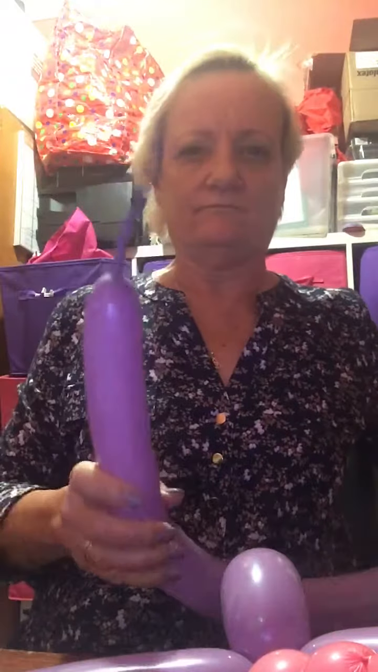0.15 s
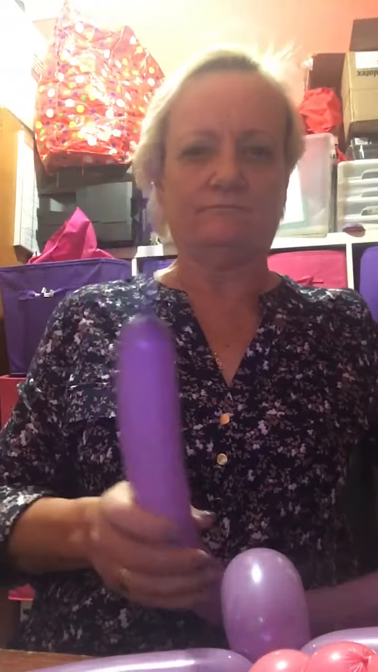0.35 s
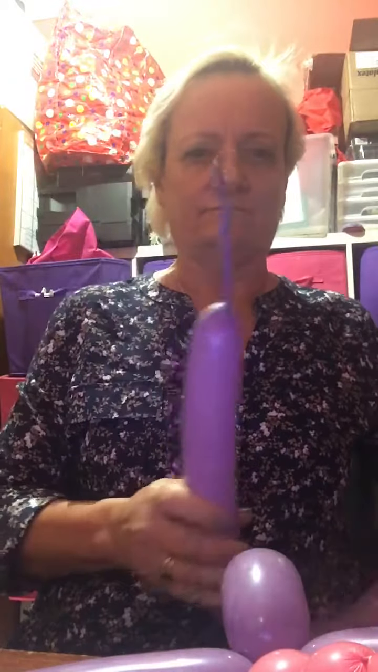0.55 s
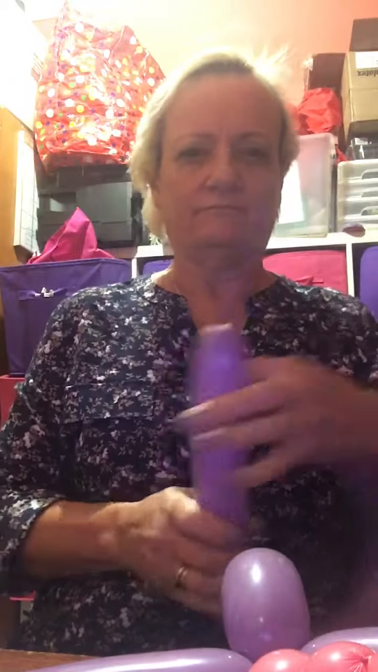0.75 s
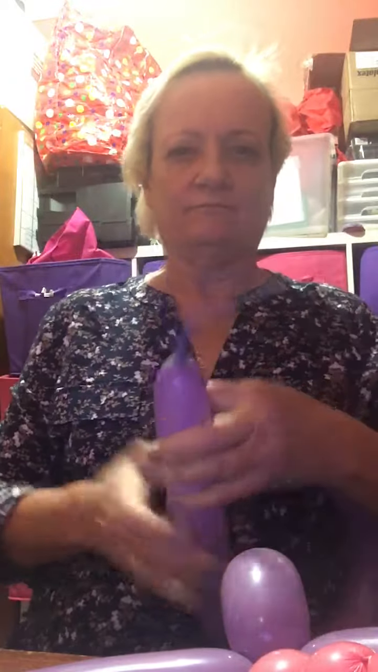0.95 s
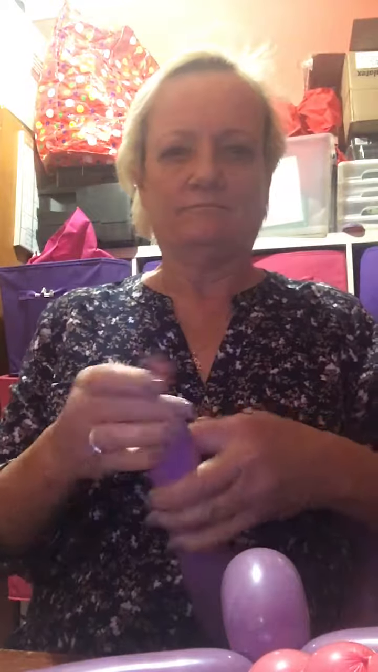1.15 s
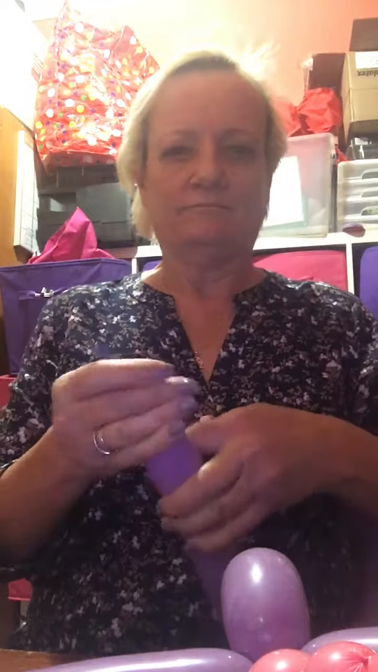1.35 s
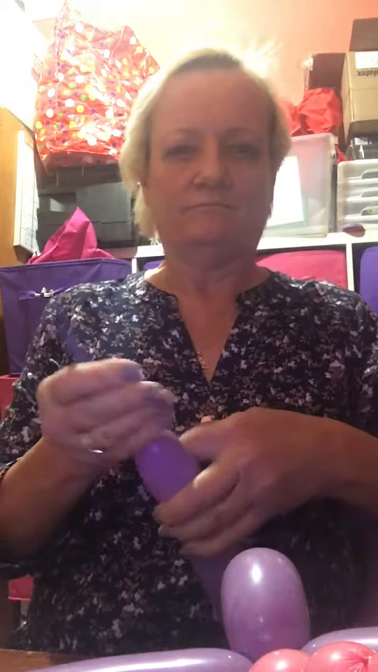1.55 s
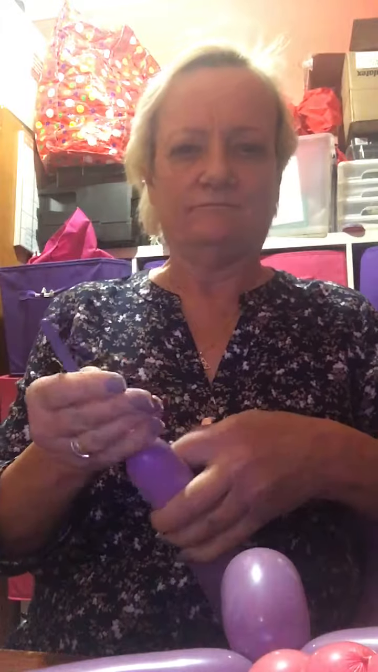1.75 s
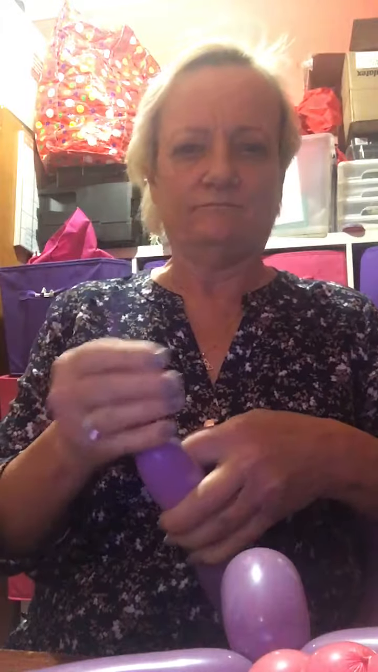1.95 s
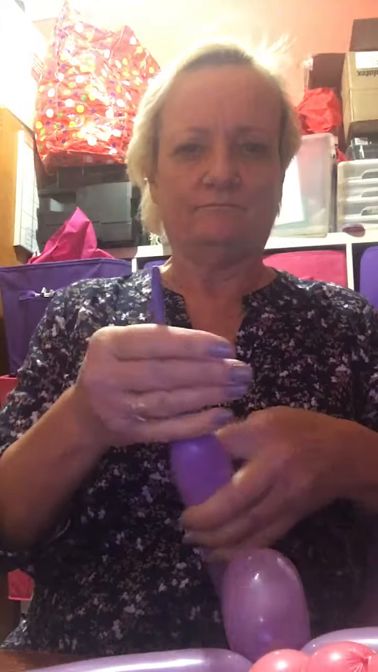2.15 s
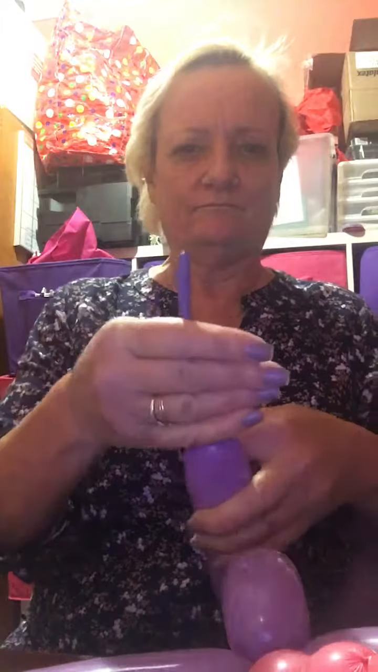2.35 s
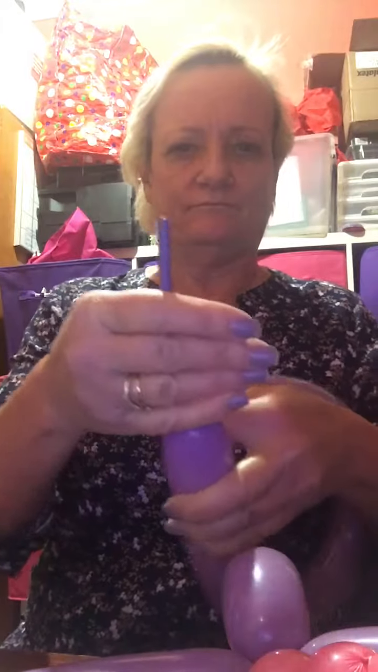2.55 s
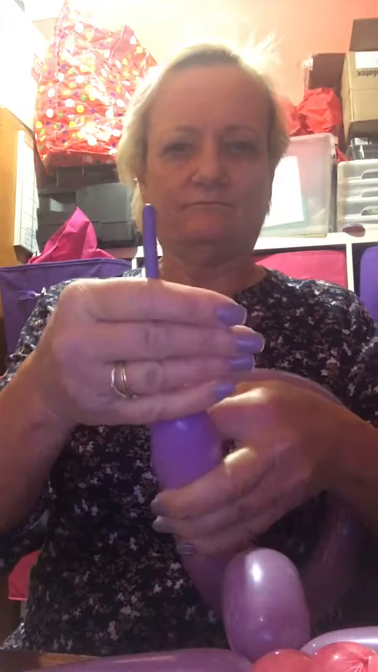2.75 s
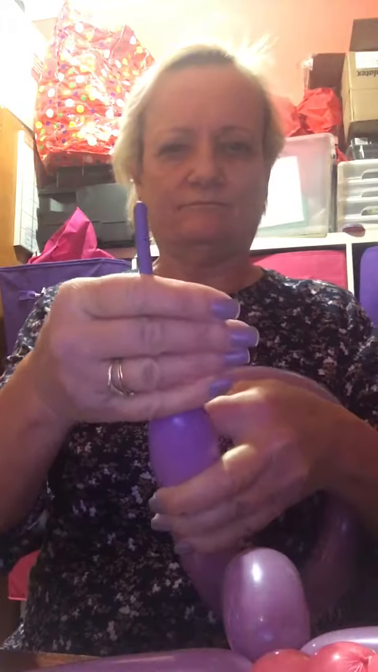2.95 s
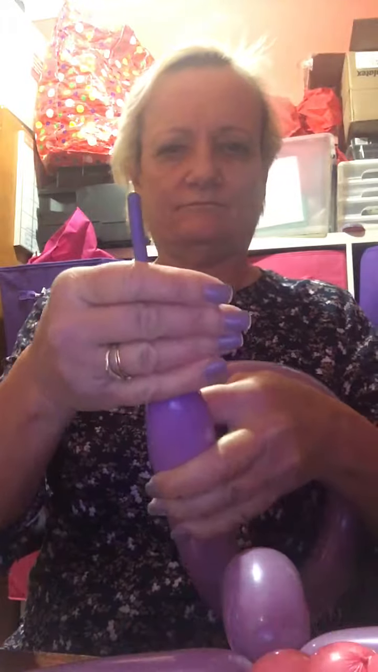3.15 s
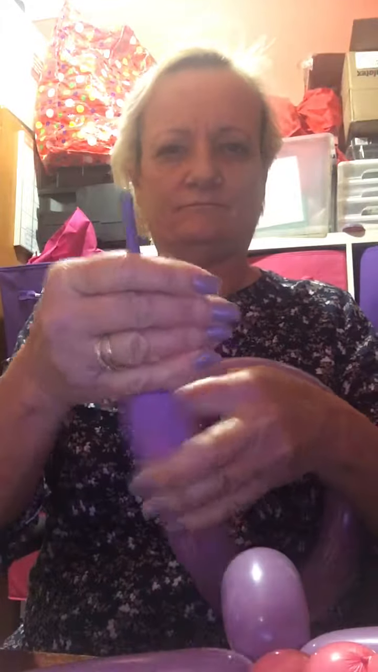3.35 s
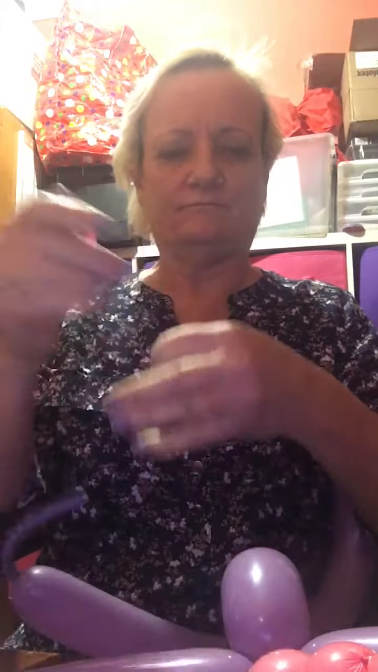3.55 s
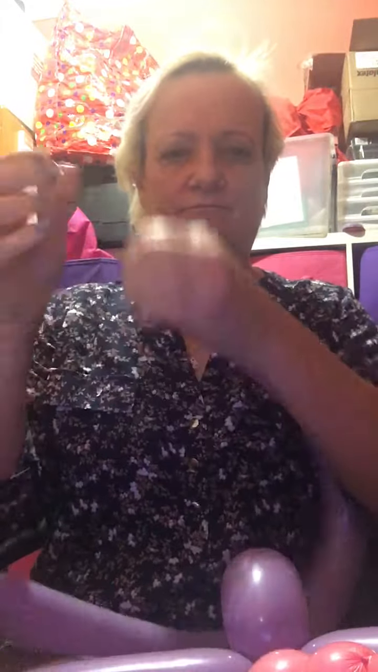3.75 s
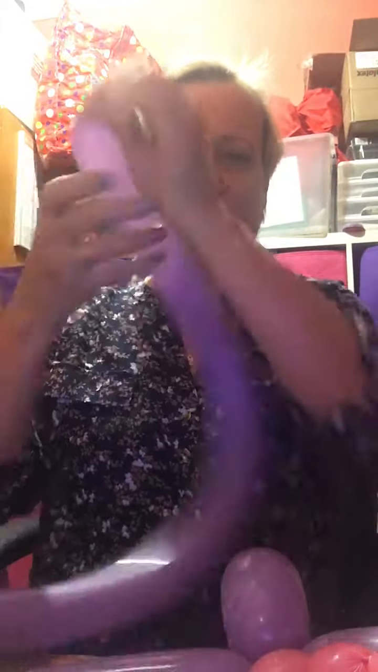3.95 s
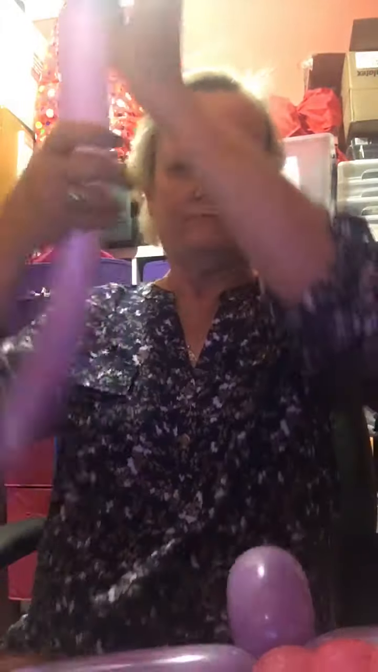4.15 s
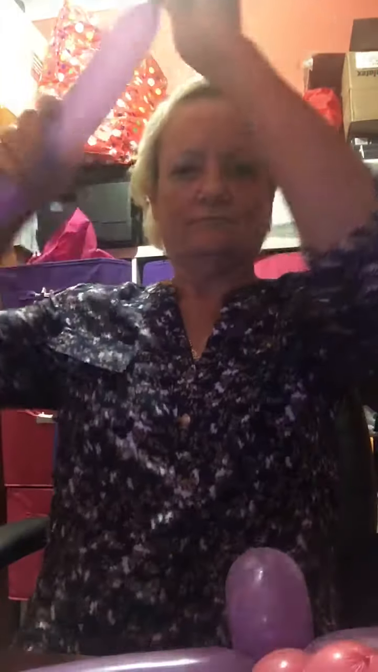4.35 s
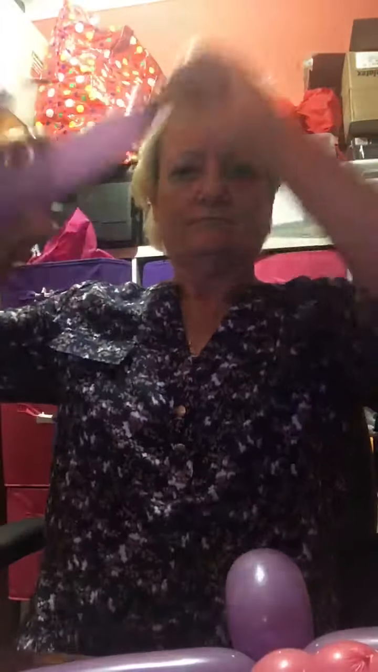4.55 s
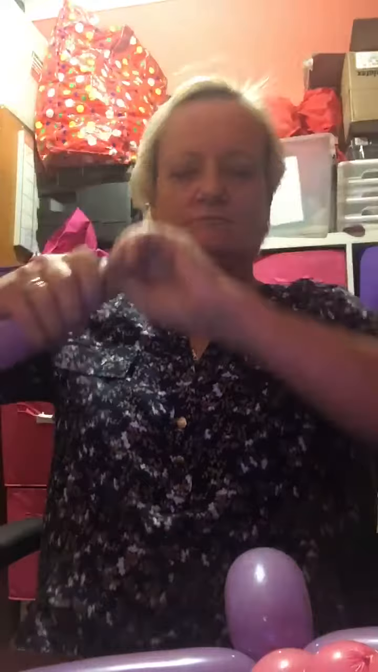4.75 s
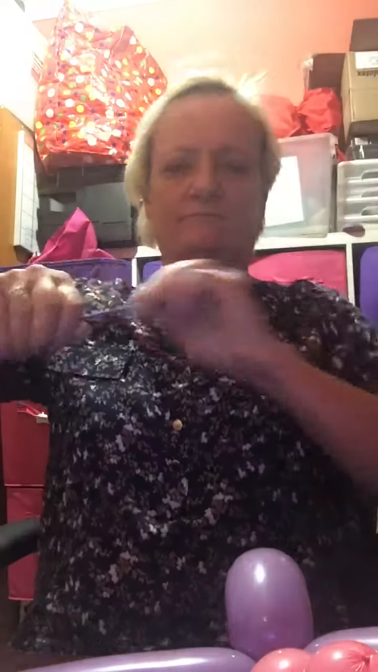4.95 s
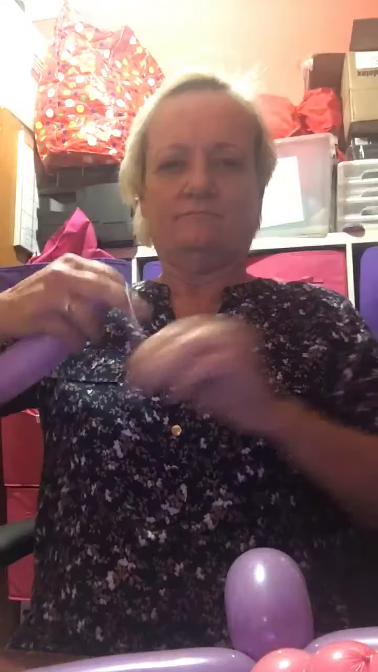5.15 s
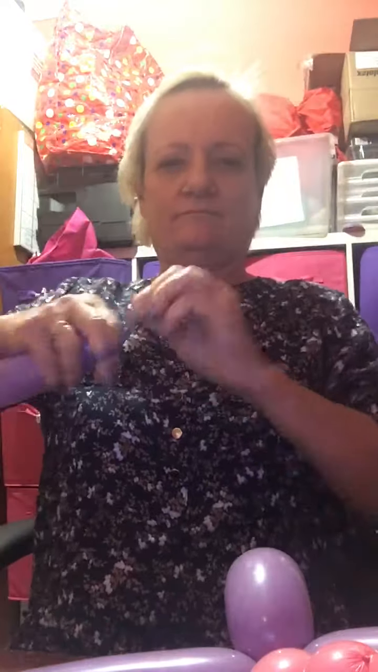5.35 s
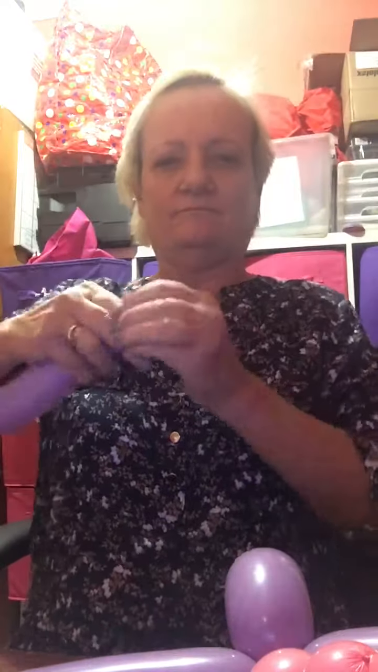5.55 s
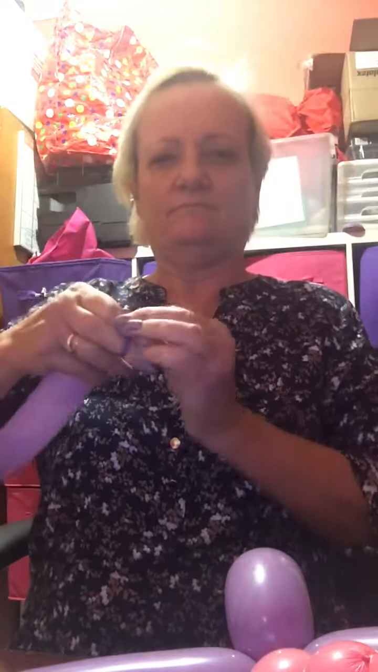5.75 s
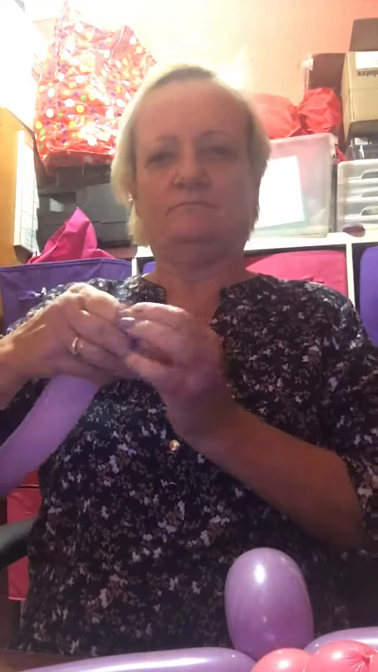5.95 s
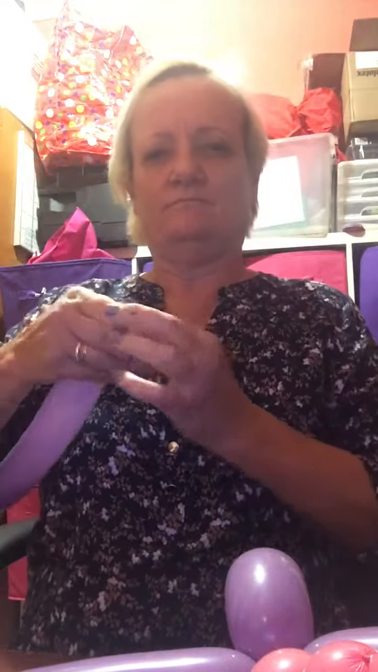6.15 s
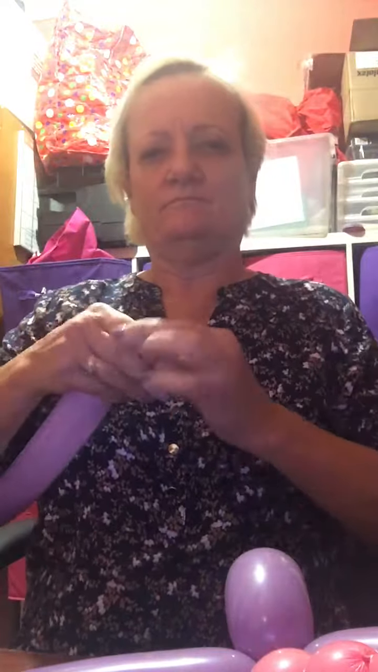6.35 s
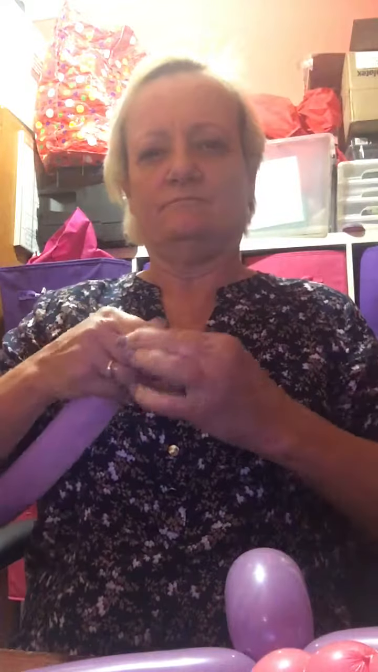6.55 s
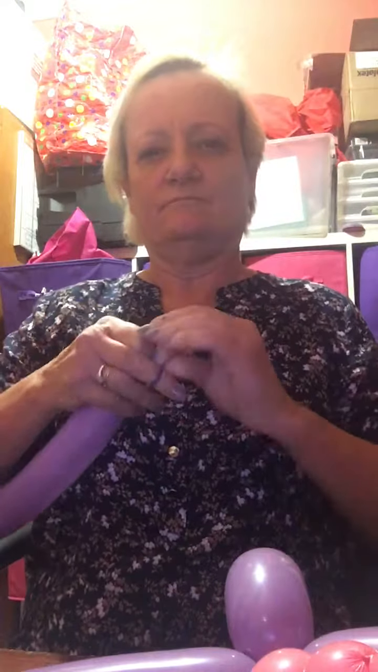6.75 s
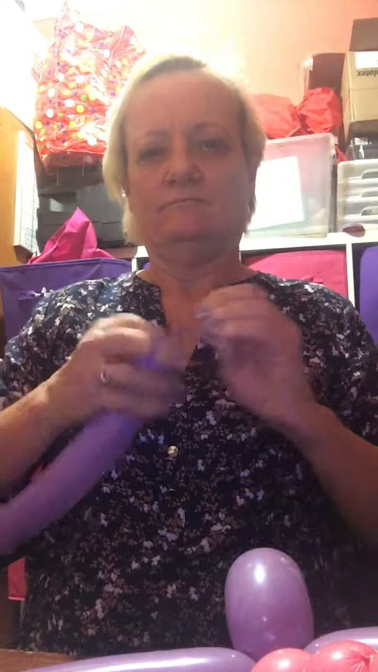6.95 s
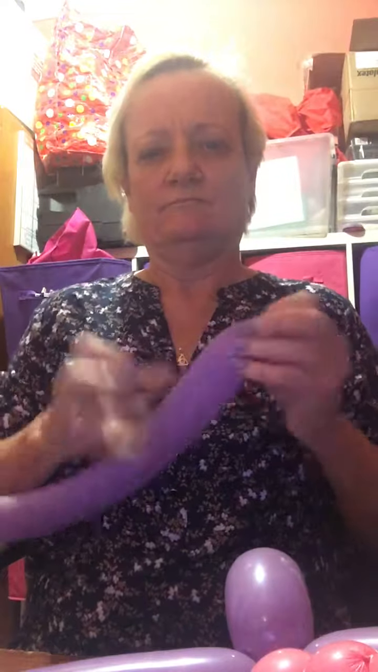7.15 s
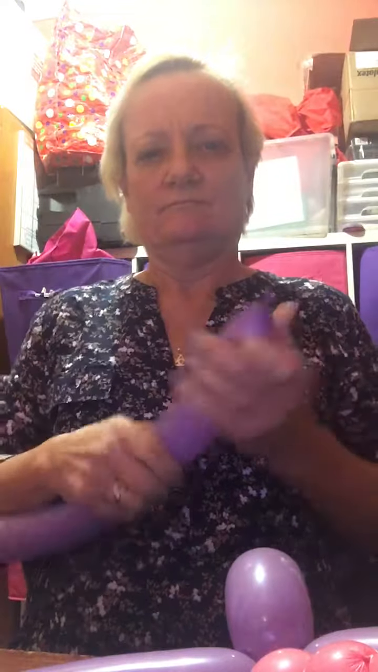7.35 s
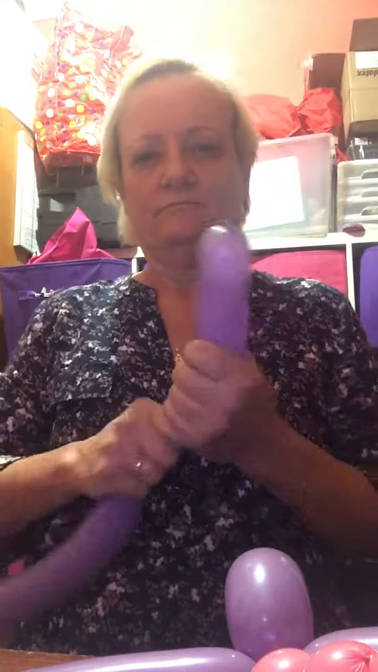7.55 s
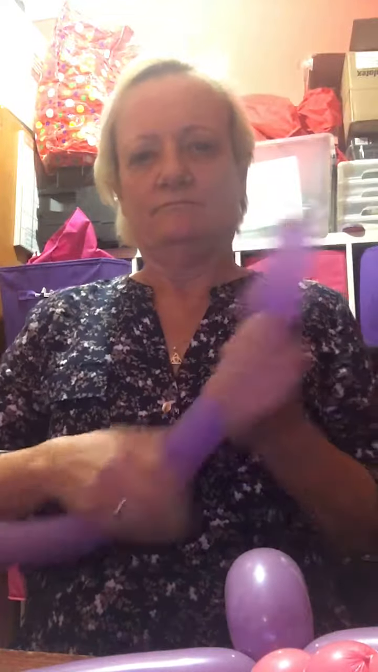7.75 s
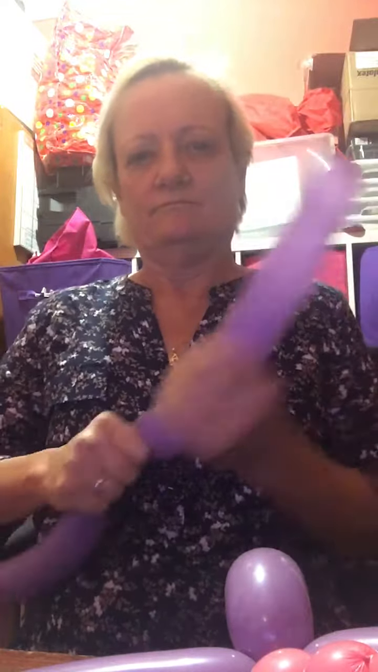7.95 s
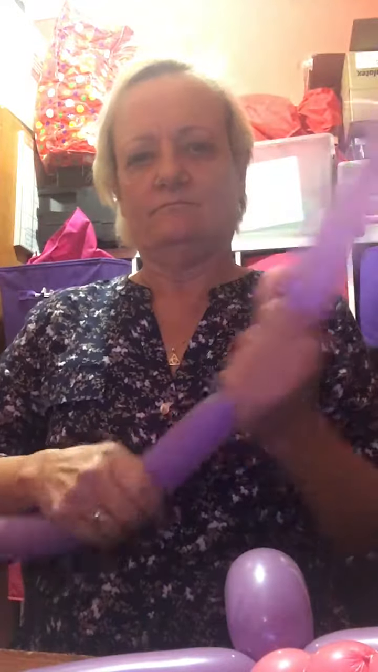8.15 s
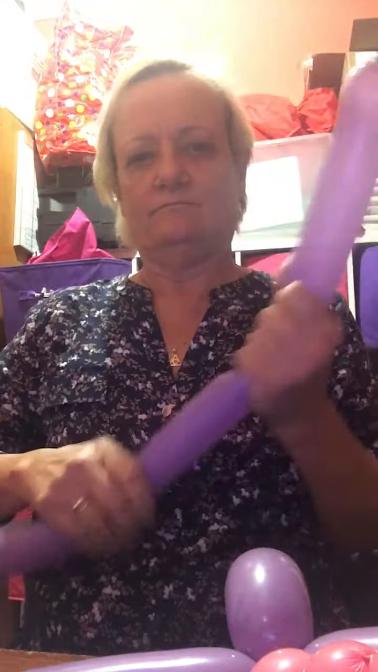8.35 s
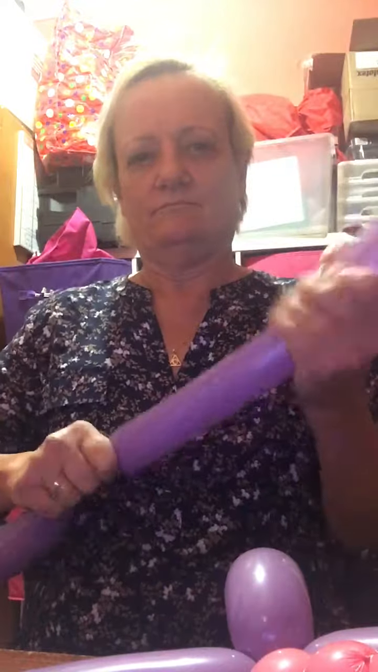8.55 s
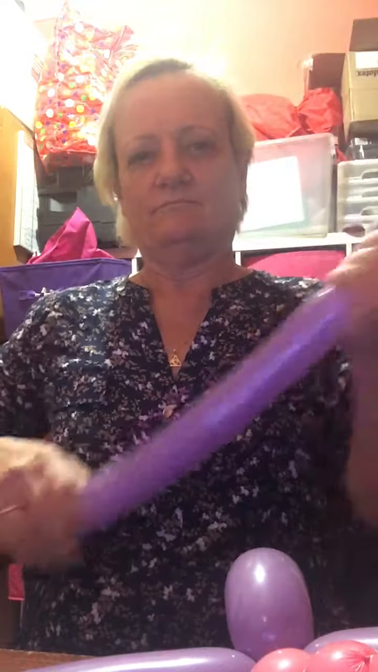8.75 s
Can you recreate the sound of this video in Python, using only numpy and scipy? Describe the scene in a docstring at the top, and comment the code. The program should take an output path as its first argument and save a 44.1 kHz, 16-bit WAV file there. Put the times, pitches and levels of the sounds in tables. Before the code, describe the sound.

A long latex balloon is handled close to the microphone in a small room with a short echo, low ventilation noise and a faint hum. For the first two seconds, fingers rub the rubber in short creaks and squeaks, with a sharp snap at about 0.6 seconds. Faint creaking fades to a lull, broken at 3.5 seconds by a loud snap and hollow thump. Smaller clicks, knocks and skin rustle follow from 4 to 4.7 seconds. Near 4.9 seconds comes one brief, loud, high squeal with a hissing flick of the tail, then another flick at 5.4 seconds. Quiet picking at the knot and soft creaks last until about 7 seconds. The loudest snap lands with a thump at 7.2 seconds. From there to nearly 9 seconds, hands slide along the balloon with steadier rubbing, short squeaks, sharp clicks and hollow knocks.

```python
"""A long latex balloon, squeezed, stretched, knotted and twisted by hand close to a phone microphone.
Skin on rubber rustles, creaks in runs of stick and slip and snaps as it lets go, ringing the inflated
wall. The fastest slips fuse into one loud squeal and a few faint ones. The thin tail whips through the
fingers, and the long tube of air thumps when knocked. The place is a small quiet room with a short
echo, low ventilation noise and a faint hum."""
import sys
import numpy as np
from scipy import signal
from scipy.fft import rfft, irfft
from scipy.io import wavfile
from scipy.ndimage import uniform_filter1d

SR = 44100
rng = np.random.default_rng(int(sys.argv[2]) if len(sys.argv) > 2 else 0)


def dump(signal):
    """Clip the signal to [-1, 1] and save it as 16-bit WAV at the path in sys.argv[1]."""
    limited = np.clip(np.atleast_2d(signal).T, -1, 1)
    pcm = np.round(limited * 32767).astype(np.int16)
    wavfile.write(sys.argv[1], SR, pcm)


N = 388080

# The inflated wall. Each row: mode frequency in Hz, width in Hz, level in dB.
WALL_MODES = [(195.6, 138, 10), (317, 150, -0.5), (441, 85, 0.5), (637, 170, 2.5), (964, 220, 2.5),
              (1189, 116, 0), (1670, 580, 0.5), (2023, 230, -1.5), (2417, 390, -3), (3336, 370, -6),
              (4020, 850, -10.5), (6000, 2730, -4.5), (9120, 950, -26.5), (12740, 2570, -20)]
# Runs of slips. Each row: start in seconds, length in seconds, level in dB, slips per second at start
# and end, pitch of the pinched patch in Hz at start and end, gain of the whole wall in dB.
CREAK_RUNS = [(0.045, 0.032, -46, 100, 125, 1400, 1400, 0.5), (0.114, 0.042, -49, 150, 110, 1400, 1400, 4),
              (0.236, .068, -44, 110, 100, 1190, 1090, 0), (0.33, .05, -45.5, 143, 145, 990, 990, 0),
              (0.395, .035, -48.5, 110, 110, 1300, 1300, -1), (0.471, .1, -32, 400, 400, 970, 970, -4),
              (0.595, 0.099, -36, 326, 400, 1030, 1240, -0.5),
              (0.841, 0.13, -40.5, 81, 83, 1430, 867, -3.5), (1.488, 0.074, -46.5, 70, 107, 1920, 1230, 2),
              (1.565, 0.1, -48.5, 50, 72, 980, 740, 2.5), (1.665, 0.13, -42.5, 97, 59.5, 750, 750, 3.5),
              (1.85, 0.098, -53.5, 133, 135, 1500, 1170, 1),
              (1.962, 0.068, -34.5, 380, 442, 1190, 1130, -2), (2.5, .31, -50, 54, 60, 1260, 1190, -6),
              (2.88, 0.13, -55, 58, 54, 1230, 1200, -4.5), (5.715, 0.047, -47.5, 120, 170, 1000, 950, -6),
              (6.545, .095, -42, 122, 77, 790, 840, -28), (6.645, .14, -41, 130, 196, 776, 1100, -6.5),
              (7.02, .11, -50, 400, 450, 1900, 1300, -7), (7.132, 0.029, -30, 390, 380, 1150, 1080, 0.5),
              (7.357, .06, -39, 400, 400, 1212, 1000, -6), (7.529, .045, -28.5, 407, 405, 1030, 970, -2.5),
              (7.857, .04, -36, 400, 460, 1230, 1190, -5.5), (8.215, 0.033, -39, 390, 500, 1350, 1380, -6)]
# The rubber lets go. Each row: start in seconds, level in dB, pitch in Hz, crispness in dB.
RUBBER_SNAPS = [(0.214, -34.5, 1210, -22), (0.442, -34.5, 650, -23), (0.579, -10, 1970, -7),
                (0.782, -29, 1190, -15), (0.829, -24, 1260, -26), (1.374, -29.5, 1590, -14),
                (2.025, -27.5, 1040, -7), (2.129, -27, 1160, -20), (3.499, -24, 460, -25),
                (3.508, -17.5, 1820, -49), (3.513, -8.5, 1080, -20), (3.595, -33.5, 1190, -29),
                (3.707, -29.5, 1410, -24), (4.059, -25.5, 1190, -26), (4.109, -21, 1170, -28),
                (4.13, -25, 527, -26), (4.177, -23.5, 2100, -27), (4.223, -24, 1270, -27),
                (4.438, -28, 1160, -30), (4.485, -29, 2040, -25), (4.497, -25.5, 1130, -32),
                (4.511, -27, 2040, -25), (4.735, -31, 1140, -11), (4.856, -19, 2020, -10),
                (5.363, -25, 1200, -5), (5.376, -23, 1050, -26), (5.811, -35, 2480, -24),
                (5.93, -34.5, 2330, -27), (6.098, -36, 970, -27), (6.123, -33, 1510, -28),
                (7.08, -29.5, 2450, -20), (7.137, -17.5, 1780, -10), (7.15, -17, 830, -19),
                (7.166, -5.5, 790, -16.5), (7.168, -3.5, 2150, -17), (7.361, -28.5, 1300, -29),
                (7.381, -24, 1130, -17), (7.496, -29, 861, -18), (7.527, -23, 970, -25),
                (7.55, -18, 2080, -27), (7.709, -22, 4130, -34), (7.816, -22, 3320, -2),
                (7.985, -28, 1120, -26), (8.002, -24.5, 1220, -28), (8.308, -23.5, 2720, -32),
                (8.321, -20, 1130, -18), (8.415, -21.5, 3800, -26), (8.502, -29.5, 1390, -8),
                (8.586, -17, 1350, -40), (8.673, -17, 3550, -48)]
# Knocks and kinks. Each row: start in seconds, level in dB, t60 in seconds, hollowness in dB.
TUBE_KNOCKS = [(0.827, -39, 0.066, 2), (3.508, -18, 0.072, 2), (3.524, -12, 0.048, 0),
               (4.06, -40, 0.16, 16), (4.109, -29.5, 0.23, 2), (4.178, -23, 0.065, -2.5),
               (4.201, -38, 0.061, 0), (4.695, -34, 0.13, -2), (4.913, -35, 0.05, 7),
               (5.375, -41.5, 0.24, 4), (7.168, -13, 0.069, -2.5), (7.376, -31.5, 0.15, 7),
               (7.542, -27, 0.093, 2), (7.604, -29.5, 0.13, -16), (7.673, -29.5, 0.081, -18),
               (7.882, -38, 0.088, 2), (7.985, -23, 0.078, -11), (8.321, -18.5, 0.11, -11),
               (8.373, -25, 0.05, -19), (8.416, -25, 0.081, -14), (8.586, -19.5, 0.15, -16.5)]
# The tube's air column and bending. Each row: mode frequency in Hz, level in dB.
TUBE_MODES = [(72, -14.5), (97, 0.5), (125, -2), (155, -4), (190, -2), (245, -8.5), (315, -7)]
# Modes across the tube. Each row: frequency in Hz, level in dB, t60 in seconds.
HOLLOW_MODES = [(445, -3, 0.063), (600, 0.5, 0.04), (920, -16, 0.067), (1172, -3, 0.11)]
# Stretched rubber singing under a fingertip. Each row: start in seconds, length in seconds,
# level in dB, pitch in Hz at start, middle and end.
SQUEAL_BENDS = [(4.866, 0.0237, -12, 2330, 2100, 2620), (4.914, .0045, -4.5, 2390, 2320, 2400),
                (4.9186, 0.00397, -10, 2250, 2300, 2400), (4.062, 0.032, -35, 1170, 1170, 1170),
                (4.138, .03, -32, 620, 510, 470), (4.175, 0.026, -36.5, 455, 410, 330),
                (.925, 0.0274, -40, 520, 495, 420)]
# A squeal's harmonics, fundamental first. Each entry: level in dB.
HARMONICS_DB = [0, -28, -44, -36, -44, -36]
# The tail whips free. Each row: start in seconds, level in dB, t60 in seconds.
TAIL_WHIPS = [(4.916, -7, 0.15), (5.366, -13.5, 0.012), (5.697, -31, 0.022), (7.709, -25, 0.04),
              (7.816, -19.5, 0.032), (8.113, -23, 0.018), (8.28, -30, .015), (8.417, -16, 0.02),
              (8.674, -18, .015)]
# The tail's hiss. Each row: frequency in Hz, spectral level in dB.
WHIP_SPECTRUM = [(290, -53), (500, -16), (1920, -8.5), (2500, 1), (3300, -10), (10300, -9.5), (13600, -5.5),
                 (15800, -12), (16500, -39)]
# Sliding fingers. Each row: time in seconds, rubbing level in dB, skin hiss level in dB.
RUB_LEVELS = [(0.0, -50, -52), (0.1, -57, -72), (0.42, -53, -73), (0.48, -44.5, -55), (0.7, -43.5, -51),
              (0.95, -52.5, -52), (1.25, -52, -58), (1.62, -49, -60), (1.81, -53, -76), (2.0, -53, -75),
              (2.2, -56, -55.5), (2.5, -55.5, -57), (2.65, -49.5, -60), (2.84, -63, -80), (3.38, -63, -80),
              (3.42, -46.5, -51), (3.56, -55, -49), (3.64, -55.5, -62), (3.78, -51, -51.5),
              (4.16, -47.5, -48.5), (4.75, -58, -54), (4.88, -44.5, -42), (5.1, -54.5, -57),
              (5.45, -54, -52.5), (6.15, -55, -63), (6.5, -51.5, -53), (6.85, -59, -56),
              (7.0, -55.5, -50.5), (7.1, -43, -43.5), (7.28, -46, -57), (7.6, -45, -49.5),
              (8.8, -48.5, -48)]
# Dry skin on rubber. Each row: frequency in Hz, spectral level in dB.
SKIN_SPECTRUM = [(1470, -8), (2500, -3), (4080, -5), (4850, -10.5), (5460, -7), (7670, -13.5),
                 (15000, -14.5), (16100, -26), (16500, -48.5)]
# The small room's echo. Each row: frequency in Hz, t60 in seconds.
ROOM_T60 = [(150, 0.34), (600, 0.16), (2400, 0.27), (6000, 0.22), (14000, 0.076)]
# Ventilation in the background. Each row: frequency in Hz, spectral level in dB.
VENT_SPECTRUM = [(15, -47), (25, -2), (43, -3), (76, 4), (146, -14), (208, -10.5), (313, -22), (410, -15),
                 (746, -18.5), (1150, -17.5), (1360, -16.5), (4130, -39.5), (16500, -74)]

CREAK_RISE_S, CREAK_FALL_S, CREAK_EDGE_DB = .01, .014, -10.5  # a run swells from and dies to this edge
BALLOON_ROOM_DB, SQUEAL_ROOM_DB = -9.5, -16  # sent to the room; low, as the microphone is close


def wall(push):
    """Rings the modes of the inflated wall; low waves travel slowly on the rubber and swell late."""
    t = np.arange(3000) / SR
    ring = np.zeros(len(t))
    for k, (hz, width, db) in enumerate(WALL_MODES):
        envelope = (1 - np.exp(-.8 * hz * t)) ** 2 * np.exp(-np.pi * width * t)
        ring += (-1) ** k * amp(db) * width * envelope * np.sin(2 * np.pi * hz * t)
    return signal.oaconvolve(push, ring / np.linalg.norm(ring))[:len(push)]


def creak(length, level_db, from_per_s, to_per_s, from_hz, to_hz, wall_db):
    """Stick and slip: each slip clicks into the wall; fast runs are more uneven and dull."""
    t = np.arange(0, length + .03, 1 / SR)
    hz = np.interp(t, [0, length], [from_hz, to_hz])
    edges = np.maximum(1 - t / CREAK_RISE_S, 0) + np.maximum(1 - (length - t) / CREAK_FALL_S, 0)
    per_s = np.interp(t, [0, length], [from_per_s, to_per_s])
    uneven = np.clip(per_s / 420, 0, 1) ** 1.2
    wander = np.tanh(unit_rms(uniform_filter1d(rng.standard_normal(len(t)), 200)))
    per_s *= np.exp(.6 * uneven * wander)
    slips = np.diff(np.floor(np.cumsum(per_s) / SR), prepend=-1) * (t <= length)
    spread_db = (1.05 + 1.6 * uneven) * rng.standard_normal(len(t))  # slow slips are alike
    slips *= amp(level_db + CREAK_EDGE_DB * edges + spread_db)
    slips *= np.sqrt(SR / per_s)  # a long stick stores more
    scrape = signal.lfilter([.09], [1, -.97], slips) * rng.standard_normal(len(t))  # drags about 1 ms
    sharp = wall(slips + .5 * scrape)
    dull = butter(sharp, 2, 3500, "low")
    patch = resonate(resonate(slips, hz, 480), hz, 480)  # the rubber under the finger
    return amp(wall_db) * (uneven * dull + (1 - uneven) * sharp) + 4.6 * patch


def snap(level_db, hz, crisp_db, noise, t60=.018):
    """The rubber lets go at once: a burst rings the released patch and the wall, with a crisp top."""
    t = np.arange(len(noise)) / SR
    burst = noise * amp(-60 * t / t60) * np.minimum(t / .00065, 1)
    patch = resonate(resonate(burst, hz, .76 * hz), hz, .76 * hz)
    wall_ring = resonate(wall(burst), hz, 5.5 * hz)
    body = unit_rms(patch) + .54 * unit_rms(wall_ring)
    top = butter(burst, 3, 4500, "high")
    return amp(level_db) * (unit_peak(body) + amp(crisp_db + 2.5) * unit_peak(top))


def knot_picking(span_s=(5.68, 6.16), count=8, level_db=-40, low_hz=910, high_hz=2720, crisp_db=-25):
    """Fingers pick at the knot: rows of small snaps, loosely spaced and random in pitch."""
    when, size, pitch = rng.random((count, 3)).T
    starts = np.interp(np.arange(count) + when, [0, count], span_s)
    levels = level_db + 6 * (size - .5)
    pitches = low_hz * (high_hz / low_hz) ** pitch
    return [(start, db, hz, crisp_db) for start, db, hz in zip(starts, levels, pitches)]


def thump(level_db, t60, hollow_db, scatter):
    """A knock rings the tube's low and hollow modes, catching each differently every time."""
    t = np.arange(SR // 3) / SR
    low, hollow = np.zeros((2, len(t)))
    for (hz, db), (catch, detune) in zip(TUBE_MODES, scatter):
        low += amp(db + 2 * catch) * np.sin(2 * np.pi * hz * (1 + .05 * detune) * t + catch)
    low *= amp(-60 * t / t60) * np.minimum(t / .0033, 1)
    for (hz, db, mode_t60), (phase, catch) in zip(HOLLOW_MODES, scatter):
        hollow += amp(db + 2 * catch - 60 * t / mode_t60) * np.sin(2 * np.pi * hz * t + 3 * phase)
    hollow *= np.minimum(t / .00082, 1)
    return amp(level_db) * (unit_peak(low) + .54 * amp(hollow_db) * hollow)


def squeal(length, level_db, from_hz, mid_hz, to_hz, hiss, hiss_db=-19):
    """Slips so fast and even that they fuse into a near sine, with air and skin noise riding on it."""
    t = np.arange(0, length, 1 / SR)
    bend = np.polyfit([0, length / 2, length], [from_hz, mid_hz, to_hz], deg=2)
    phase = 2 * np.pi * np.cumsum(np.polyval(bend, t)) / SR
    tone = np.sqrt(2) * sum(amp(db) * np.sin(k * phase) for k, db in enumerate(HARMONICS_DB, 1))
    return amp(level_db) * (tone + amp(hiss_db) * hiss[:len(t)]) * signal.windows.tukey(len(t), .5)


def whip(level_db, t60, hiss):
    """The thin tail whips through the fingers: a bright spit of hiss that trails off."""
    t = np.arange(len(hiss)) / SR
    return amp(level_db - 60 * t / t60) * np.minimum(t / .00058, 1) * hiss / 3


def rubbing(slips_per_s=2500):
    """A dense rain of tiny slips into the wall, under dry skin hiss; both shift as the grip moves."""
    times, rub_db, hiss_db = np.transpose(RUB_LEVELS)
    t = np.arange(N) / SR
    sizes = amp(2 * np.minimum(rng.exponential(1, N), 4))
    slips = sizes * np.sign(rng.standard_normal(N)) * (rng.random(N) < slips_per_s / SR)
    body = drift_colour(wall(slips), 2.4) * flicker(.03, 3.1)
    hiss = drift_colour(coloured_noise(SKIN_SPECTRUM), 1.9) * flicker(.012, 1.26) * flicker(.07, 2.6)
    return body * amp(np.interp(t, times, rub_db)) + hiss * amp(np.interp(t, times, hiss_db))


def room_echo(sound):
    """The small room answers with sparse reflections, each band dying at its own speed."""
    taps = np.zeros(SR // 2)
    slots = np.arange(150, len(taps) - 20, 20)
    taps[slots + rng.integers(0, 20, len(slots))] = rng.choice([-1., 1.], len(slots))
    hz, t, bands = signal.stft(taps, SR, nperseg=256)
    decay = amp(-60 * t / curve_at(ROOM_T60, hz)[:, None])
    tail = signal.istft(bands * decay, SR, nperseg=256)[1]
    return signal.fftconvolve(sound, tail / np.linalg.norm(tail))[:N]


def room_tone(vent_db=-56, hum_hz=201.6, hum_db=-67.5):
    """Low ventilation noise and a faint wavering hum, well behind the balloon."""
    hum = unit_rms(resonate(rng.standard_normal(N), hum_hz, 3.3))
    return amp(vent_db) * coloured_noise(VENT_SPECTRUM) * flicker(.12, 2.5) + amp(hum_db) * hum


def amp(db):
    return 10 ** (np.asarray(db) / 20)


def unit_rms(x):
    return x / np.sqrt(np.mean(x ** 2) + 1e-20)


def unit_peak(x):
    return x / abs(x).max()


def curve_at(points, hz):
    point_hz, values = np.transpose(points)
    return np.interp(np.log(hz + 1), np.log(point_hz + 1), values)


def add(mix, start, sound):
    part = mix[round(start * SR):][:len(sound)]
    part += sound[:len(part)]


def butter(x, order, hz, kind):
    return signal.sosfilt(signal.butter(order, hz, kind, fs=SR, output="sos"), x)


def resonate(x, hz, width_hz):
    """A resonance that can glide: shifts hz down to zero, smooths, and shifts back."""
    carrier = np.exp(2j * np.pi * np.cumsum(hz * np.ones(len(x))) / SR)
    pole = np.exp(-np.pi * width_hz / SR)
    return 2 * (carrier * signal.lfilter([1 - pole], [1, -pole], x / carrier)).real


def coloured_noise(spectrum):
    """Steady noise with the given spectral shape."""
    gains = amp(curve_at(spectrum, np.fft.rfftfreq(N, 1 / SR)))
    return unit_rms(irfft(rfft(rng.standard_normal(N)) * gains, N))


def flicker(seconds, depth_db):
    """A gain that wanders on the given time scale."""
    wander = unit_rms(uniform_filter1d(rng.standard_normal(N), round(seconds * SR)))
    return unit_rms(amp(depth_db * wander))


def drift_colour(x, depth_db):
    """Lets the colour drift in patches about a kilohertz wide and a tenth of a second long."""
    bands = signal.stft(x, nperseg=512)[2]
    field = uniform_filter1d(rng.standard_normal(bands.shape), size=12, axis=0)
    field = unit_rms(uniform_filter1d(field, size=14, axis=1))
    return unit_rms(signal.istft(bands * amp(depth_db * field), nperseg=512)[1][:N])


def scene():
    """The balloon up close and the room behind it, in mono."""
    balloon, squeals = np.zeros((2, N))
    hisses = np.array_split(coloured_noise(WHIP_SPECTRUM), 20)
    for start, *row in CREAK_RUNS:
        add(balloon, start, creak(*row))
    for start, *row in RUBBER_SNAPS + knot_picking():
        add(balloon, start, snap(*row, rng.standard_normal(3000)))
    for (start, *row), hiss in zip(TAIL_WHIPS, hisses):
        add(balloon, start, whip(*row, hiss))
    for start, *row in TUBE_KNOCKS:
        add(balloon, start, thump(*row, rng.standard_normal((len(TUBE_MODES), 2))))
    for (start, *row), hiss in zip(SQUEAL_BENDS, hisses[::-1]):
        add(squeals, start, squeal(*row, hiss))
    echoes = room_echo(amp(BALLOON_ROOM_DB) * balloon + amp(SQUEAL_ROOM_DB) * squeals)
    return (balloon + squeals + echoes + rubbing() + room_tone())[None]


def record(dry):
    """The small microphone drops the deepest bass, clips the loudest peaks and cuts the top treble."""
    clipped = np.clip(butter(dry, 3, 45, "high"), -.95, .95)
    band_limit = signal.firwin(511, 15900, window=("kaiser", 9), fs=SR)
    return signal.oaconvolve(clipped, band_limit[None], "same")


dry = scene()
out = record(dry)
dump(out)
```